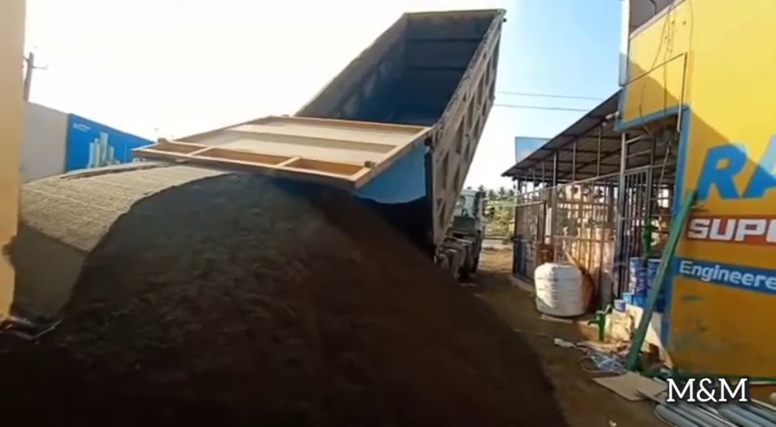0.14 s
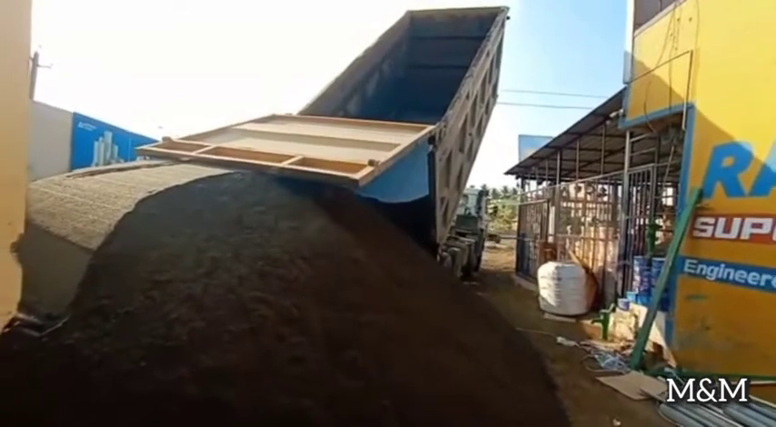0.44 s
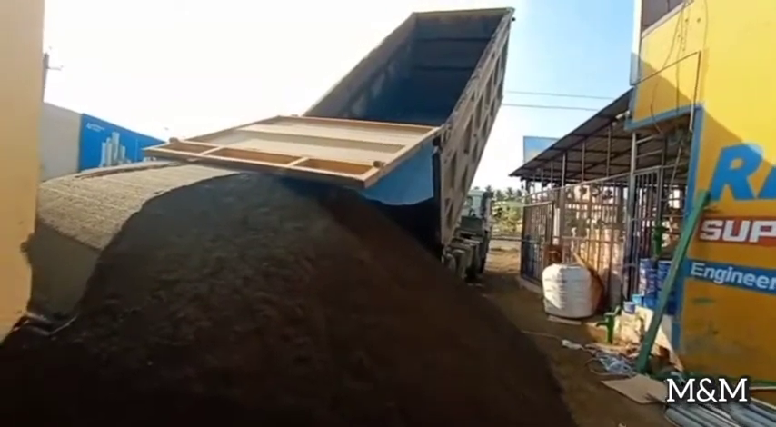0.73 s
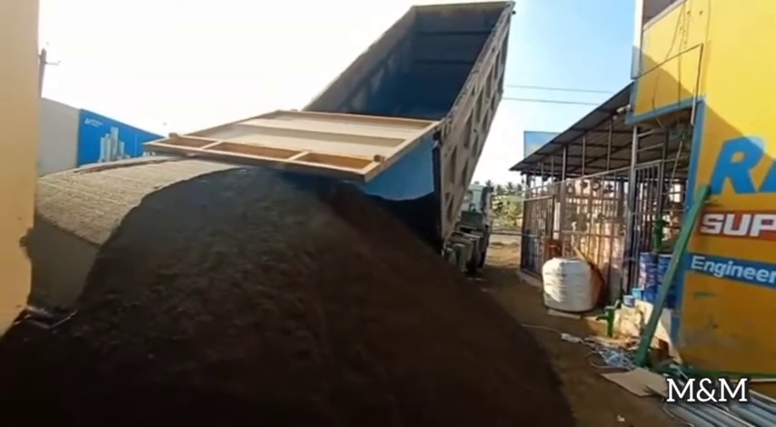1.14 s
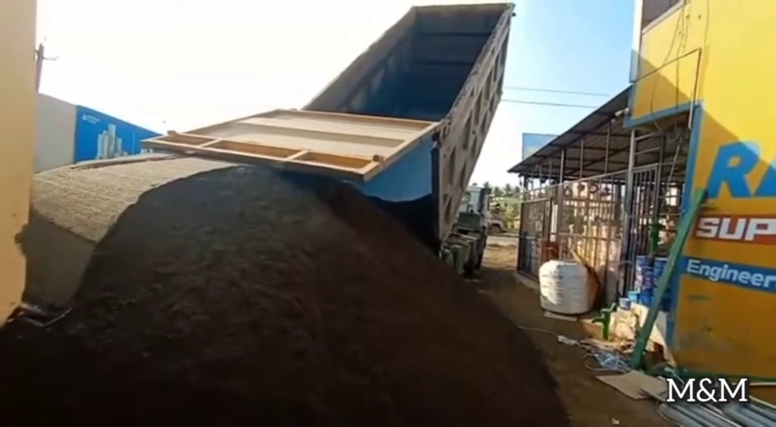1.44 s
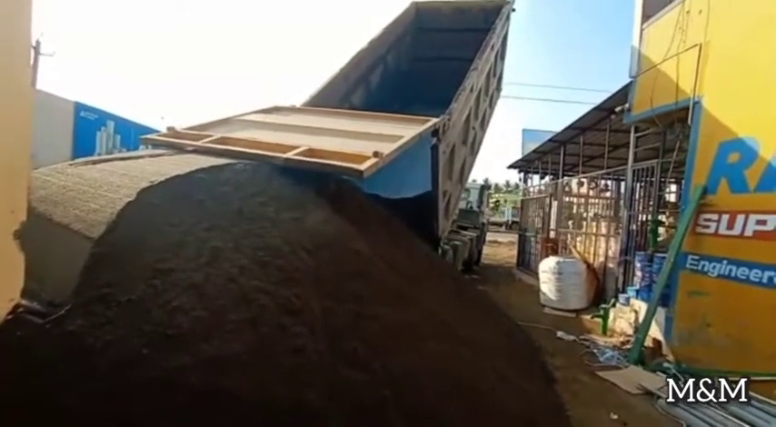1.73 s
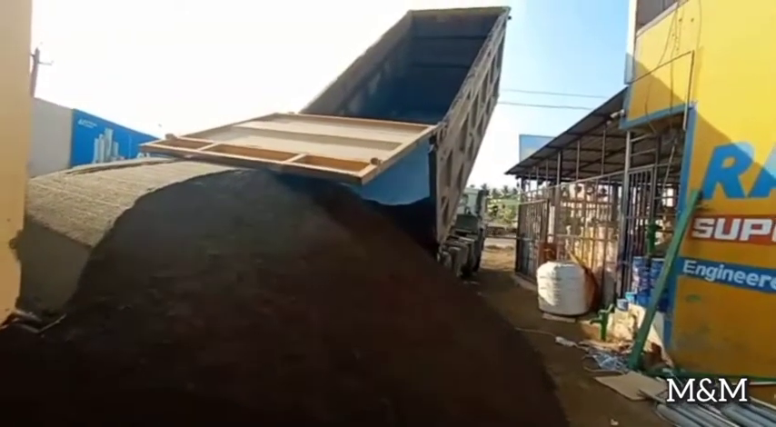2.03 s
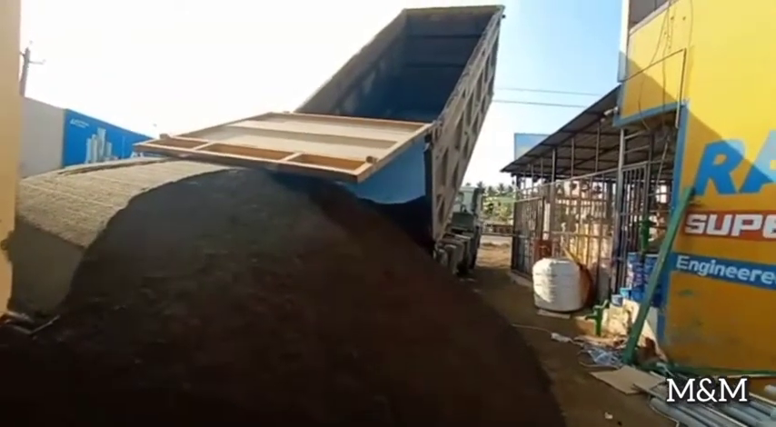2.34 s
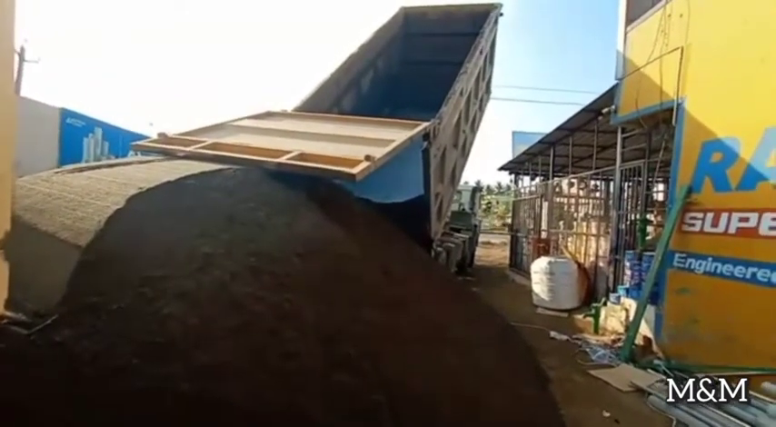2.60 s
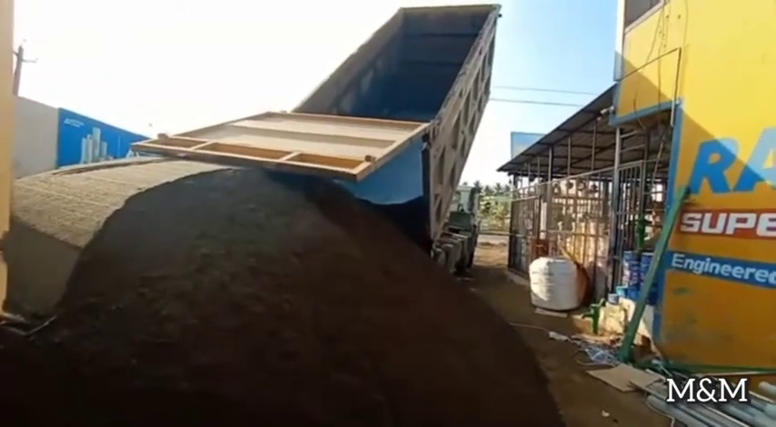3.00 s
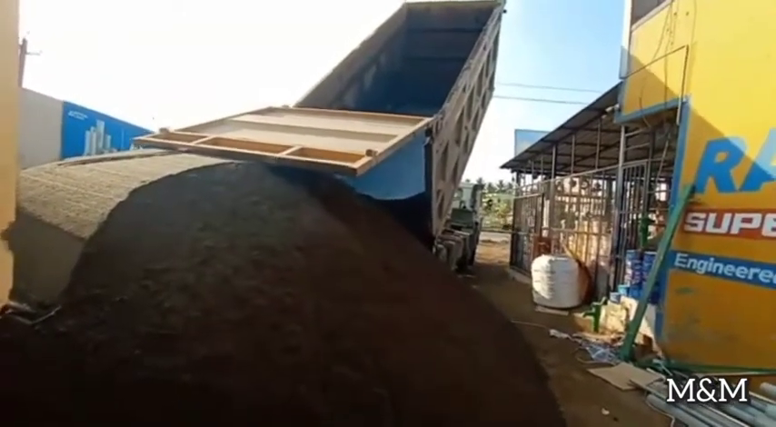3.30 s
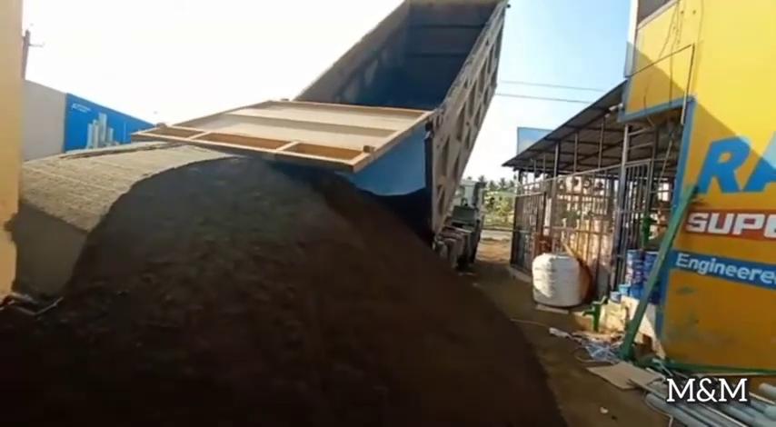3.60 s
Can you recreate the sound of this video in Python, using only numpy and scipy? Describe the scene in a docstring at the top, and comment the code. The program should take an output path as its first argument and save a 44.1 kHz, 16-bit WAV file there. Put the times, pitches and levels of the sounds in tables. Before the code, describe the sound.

Sand pours from a steel truck body in an open yard: a dense, patchy hiss, strongest at the start, thinning after about 1.7 s, with a slight swell near 2.8 s. Short whining hums, thin whistles and faint scrapes colour it over a low, uneven engine chug. At 3.27 s a far louder knock booms hollowly, with a bright air puff around 3.3-3.5 s and dull settling lumps as it rings into the end.

```python
"""A rushing hiss of sand sliding out of a raised steel tipper body in a yard: dense random grains,
coloured and patchy, over a steadier far rush from the heap and the low chug of the idling engine.
The rubbed steel hums, whistles and scrapes as narrow resonances of noise. Near the end the body takes
one heavy knock and booms on through noisy decaying modes, with a few dull lumps as it settles.
A short bright puff of air comes with the boom."""
import sys
import numpy as np
from scipy import signal
from scipy.fft import rfft, irfft
from scipy.io import wavfile

SR = 44100
rng = np.random.default_rng(int(sys.argv[2]) if len(sys.argv) > 2 else 0)


def int16_out(signal):
    """Quantize to a 16-bit WAV file."""
    q = np.round(np.clip(np.atleast_2d(signal).T, -1, 1) * 32767)
    wavfile.write(sys.argv[1], SR, q.astype(np.int16))


N = 165375

# Flow of the sand, heard as the level of its hiss. Each row: time in seconds, level in dB.
FLOW = [(0.0, -41.5), (0.22, -45), (0.66, -44), (0.88, -48.5), (1.43, -46.5), (1.62, -49.5), (1.79, -53.5),
        (2.05, -54), (2.77, -50.5), (2.87, -49.5), (3.05, -54.5), (3.28, -59.5), (3.45, -57.5),
        (3.75, -59.5)]
# Colour of the sand's hiss. Each row: frequency in Hz, relative density in dB per Hz.
HISS_COLOUR = [(440, -47), (750, -13), (885, -32), (956, -2.5), (1060, -11.5), (1250, -2), (1370, -4),
               (1650, -19), (1760, -19), (1980, -8), (2300, -11.5), (3890, -3), (4700, -8), (5480, -2.5),
               (6230, -12), (6900, -3.5), (8040, -23), (9610, -17.5), (13600, -31), (14800, -30.5),
               (15800, -23)]
BOOM_START_S, BOOM_RISE_S = 3.278, 0.0078  # the rise is a time constant


def sand():
    """Dense grains of either sign rush down the body, and a steadier far rush settles on the heap."""
    # Colour of the far heap. Each row: frequency in Hz, relative density in dB per Hz.
    heap_colour = [(24, -13), (40, -14.5), (64, -6.5), (189, -3.5), (230, -8.5), (268, -3.5), (327, -10),
                   (410, -8.5), (464, -8.5), (596, -9.5), (676, -13), (1260, -9), (1360, -9.5),
                   (2030, -12.5), (3110, -16), (5000, -58), (6750, -13.5), (8040, -34.5), (15800, -47)]
    grains_per_s = 9000
    signs = rng.choice([-1, 1], N)
    grains = rms_one(signs * (rng.random(N) < grains_per_s / SR))
    grains = grains + 1.77 * rng.standard_normal(N)  # grains too dense to tell apart
    flow_db = in_time(FLOW)
    rush = amp(flow_db) * patchy(grains, HISS_COLOUR, patchy_db=1.5, slow_hz=15, fast_hz=35)
    # the heap follows the flow only faintly
    heap_db = -47 + 0.082 * (flow_db - flow_db.mean())
    heap = patchy(rng.standard_normal(N), heap_colour, patchy_db=2, slow_hz=1, fast_hz=17.2)
    return rush + amp(heap_db) * heap


def hum():
    """Sand rubs the steel: noise in its resonances gives a hum, a murmur, a bright band and whistles."""
    # Resonances of the hum, the lower murmur, a bright band of the hiss that swells on its own,
    # and the thin whistles. Each row: frequency in Hz, width in Hz, relative level in dB.
    hum_modes = [(1269, 34, -5), (1236, 67, -4.5), (1424, 290, -10), (1640, 41, -9.5)]
    murmur_modes = [(625, 106, 3), (456.5, 29, -7.5)]
    bright_modes = [(5405, 140, -1.5), (5770, 210, 3)]
    whistle_modes = [(2560, 90, -19), (3250, 120, -18), (3730, 160, -17), (4025, 90, -19), (6700, 160, -14),
                     (6900, 140, -17)]
    # Swells of the first three. Each row: time in seconds, relative level in dB.
    hum_level = [(0.0, -49), (0.15, -41.5), (0.25, -56.5), (0.88, -49.5), (0.95, -69), (1.72, -56.5),
                 (2.7, -51.5), (3.25, -56.5), (3.29, -30), (3.36, -40), (3.45, -59), (3.75, -44)]
    murmur_level = [(0.0, -56), (0.06, -53), (0.22, -60), (1.56, -65.5), (1.97, -65), (1.99, -56.5),
                    (2.39, -66), (2.46, -55.5), (2.71, -68), (2.74, -55.5), (2.87, -65.5), (2.96, -55.5),
                    (3.23, -62.5), (3.25, -72)]
    bright_level = [(0.0, -48), (0.23, -50), (0.65, -45.5), (0.98, -51), (1.04, -58), (1.08, -49),
                    (1.25, -54), (1.27, -44.5), (1.88, -64), (2.99, -55), (3.08, -84), (3.25, -56)]
    flicker_db, flicker_hz = 1.5, 12
    out = resonant(hum_modes, flicker_db, flicker_hz) * amp(in_time(hum_level) - 1)
    out = out + resonant(murmur_modes, flicker_db, flicker_hz) * amp(in_time(murmur_level) + 1.5)
    out = out + resonant(bright_modes, flicker_db, flicker_hz) * amp(in_time(bright_level) - 10)
    whistles = resonant(whistle_modes, flicker_db=3.5, flicker_hz=8)
    return out + (whistles + streaks(count=44)) * amp(in_time(FLOW))


def streaks(count):
    """Thin resonances of the sliding sand wander in pitch and come and go, coloured like the hiss."""
    out = 0
    for hz in np.linspace(1900, 10500, count) * rng.uniform(.98, 1.02, count):
        level_db = -15 + at_hz(HISS_COLOUR, hz) + 4 * drift(6)
        wandering_hz = hz + 60 * drift(3)
        out = out + amp(level_db) * rough_tone(wandering_hz, width_hz=30)
    return out


def scrapes():
    """Brief scrapes on the steel and whining spurts of its hum: rough tones that sag in pitch."""
    # Scrapes, then spurts. Each row: start in seconds, length in seconds, first pitch in Hz, level in dB.
    scrape_rows = [(1.68, .25, 2290, -50), (2.05, .15, 1720, -55), (2.42, .08, 2170, -56),
                   (2.4, .08, 3700, -56), (2.55, .1, 3080, -57), (3.68, .1, 2700, -53),
                   (3.695, .06, 1040, -49)]
    spurt_rows = [(.04, .12, 1270, -46), (.19, .05, 1230, -49), (.29, .13, 1260, -46), (.5, .08, 1290, -50),
                  (.655, .08, 1280, -43), (.74, .06, 1280, -46), (.81, .075, 1270, -45),
                  (.95, .045, 1255, -50), (1.12, .06, 1255, -50), (1.28, .1, 1270, -51),
                  (1.49, .09, 1240, -51), (3.53, .06, 1270, -46), (3.62, .06, 1275, -46)]
    scraping = sagging(scrape_rows, width_hz=45, sag_hz_per_s=1000)
    return scraping + sagging(spurt_rows, width_hz=22, sag_hz_per_s=500)


def thump():
    """The heavy knock: contact notes, a crack, ringing modes and a boom, then dull settling lumps."""
    # The body settles in dull lumps. Each row: start in seconds, peak in dB, pitch in Hz.
    lumps = [(3.295, -26, 124), (3.41, -27, 120), (3.635, -32, 172), (3.685, -29.5, 212)]
    return knocks() + crack() + body_ring() + boom() + soft_notes(lumps)


def knocks():
    """The contact builds and holds for a few milliseconds, then each note dies at its own rate."""
    # Contacts on the body. Each row: start in seconds, level in dB.
    contacts = [(3.2655, -27), (3.2727, -8.5)]
    # Short notes of each contact. Each row: pitch in Hz, relative level in dB, 60 dB decay in seconds.
    notes = [(493, -3.5, 0.012), (190, -13, 0.063)]
    swell_s, hold_s = .003, .0085  # both counted from the start
    out = 0
    for start_s, level_db in contacts:
        t = since(start_s)
        swell = np.minimum(t / swell_s, 1)
        for hz, db, t60 in notes:
            dying = amp(-60 * np.maximum(t - hold_s, 0) / t60)
            out = out + amp(level_db + db) * swell * dying * np.sin(2 * np.pi * hz * t)
    return out


def crack():
    """A short rough burst of the upper plate resonances at the height of the blow."""
    # Plate resonances. Each row: frequency in Hz, width in Hz, relative level in dB.
    plate_modes = [(1000, 400, 4), (1500, 400, 5), (2200, 700, 1), (3400, 450, -2), (4100, 700, -10)]
    t = since(3.2745)
    envelope = amp(-32 - 60 * t / .2) * (1 - np.exp(-t / BOOM_RISE_S))  # dies by 60 dB in 0.2 s
    return envelope * resonant(plate_modes, flicker_db=0, flicker_hz=50)


def body_ring():
    """The plate modes of the body, roughened by the loose load, ring on and die from the blow."""
    # Each row: frequency in Hz, relative level in dB, 60 dB decay in seconds.
    body_modes = [(201, 5.5, 1.25), (270, 5, 0.52), (519.5, 10, 0.29), (580, 1, 2.1), (622, -13, 1.7),
                  (1054, -13, 1.5), (1577, -6, 0.89)]
    t = since(BOOM_START_S)
    rise = 1 - np.exp(-t / BOOM_RISE_S)
    out = 0
    for hz, db, t60 in body_modes:
        mode = amp(-60 * t / t60) * rough_tone(np.full(N, hz), width_hz=12)
        out = out + amp(-38 + db) * rise * mode
    return out


def boom():
    """Coloured noise in bands, each wavering and dying at the rate for its pitch."""
    # Colour of the boom. Each row: frequency in Hz, relative density in dB per Hz.
    boom_colour = [(24, -56), (40, -19), (108, -5), (290, -5), (347, -8.5), (443, -2), (520, 2), (587, -1),
                   (677, -3.5), (880, -13), (1270, -9), (1520, -17.5), (1650, -15.5), (1930, -20),
                   (3270, -29), (3690, -33), (5000, -39), (6500, -55), (11000, -120)]
    # Dying of the boom. Each row: frequency in Hz, 60 dB decay in seconds.
    boom_t60 = [(60, 9.1), (120, 3.4), (240, 2.24), (500, 0.88), (1000, 0.81), (2500, 1), (5000, 2.05)]
    t = since(BOOM_START_S)
    rise = 1 - np.exp(-t / BOOM_RISE_S)
    out = 0
    for hz, band in bands(rng.standard_normal(N), boom_colour):
        level_db = -21.5 - 60 * t / at_hz(boom_t60, hz) + 3 * drift(16)
        out = out + amp(level_db) * rise * band
    return out


def puff():
    """Air let off in a short bright, slightly sputtering hiss with thin whistles in it."""
    # Course of the puff. Each row: time in seconds, level in dB.
    puff_level = [(3.285, -60), (3.326, -40.5), (3.376, -35), (3.44, -49.5), (3.5, -70)]
    # Colour of the air. Each row: frequency in Hz, relative density in dB per Hz.
    puff_colour = [(2350, -23), (4000, -10), (4950, -21), (5750, -8.5), (6710, -8), (7110, -3.5),
                   (8300, -30), (9920, -25), (11200, -41), (15000, -46), (15800, -45)]
    # Whistles in the air. Each row: frequency in Hz, width in Hz, relative level in dB.
    puff_whistles = [(5940, 80, -11), (6490, 90, -5), (6900, 160, -3), (9870, 150, -30)]
    t = np.arange(N) / SR
    hiss = sum(band for _, band in bands(rng.standard_normal(N), puff_colour))
    air = rms_one(.7 * hiss + resonant(puff_whistles, flicker_db=2, flicker_hz=40))
    sputter_db = drift(150)
    blowing = (t > puff_level[0][0]) & (t < puff_level[-1][0])
    return amp(in_time(puff_level) + sputter_db) * blowing * air


def engine():
    """The idling engine chugs: a soft low note for each chug."""
    # Each row: start in seconds, peak in dB, pitch in Hz.
    chugs = [(0.088, -43.5, 195), (0.183, -38.5, 151), (0.297, -48, 197), (0.401, -45, 198),
             (0.472, -46, 199), (0.58, -44.5, 177), (0.706, -40.5, 190), (0.89, -47, 207),
             (1.005, -44.5, 170), (1.09, -49, 149), (1.188, -51, 136), (1.336, -46.5, 188),
             (1.413, -42.5, 129), (1.573, -40, 153), (1.697, -45, 150), (1.831, -44.5, 141),
             (1.93, -39.5, 153), (2.094, -47, 187), (2.212, -43, 190), (2.351, -43, 187), (2.493, -47, 200),
             (2.716, -43, 147), (2.854, -40.5, 166), (2.965, -43, 191), (3.131, -41, 180)]
    return soft_notes(chugs)


def soft_notes(rows):
    """Each row is a low note at a random phase that swells softly and dies."""
    swell_hz, t60_s = 25, 0.089
    out, t = np.zeros(N + SR), np.arange(SR // 4) / SR
    shape = (1 - np.exp(-2 * np.pi * swell_hz * t)) ** 2 * amp(-60 * t / t60_s)
    shape = shape / shape.max()
    for (start_s, db, hz), phase in zip(rows, rng.random(len(rows))):
        i = int(start_s * SR)
        out[i:i + len(t)] += amp(db) * shape * np.sin(2 * np.pi * (hz * t + phase))
    return out[:N]


def sagging(rows, width_hz, sag_hz_per_s):
    """Each row is a rough narrow tone that swells and fades while its pitch sags."""
    out, t = 0, np.arange(N) / SR
    for start_s, length_s, hz, db in rows:
        age = np.clip(t - start_s, 0, length_s)
        tone = rough_tone(hz - sag_hz_per_s * age, width_hz, steady=1.6)
        out = out + amp(db) * tone * np.sin(np.pi * age / length_s)
    return out


def rough_tone(hz, width_hz, steady=0):
    """A narrow tone along a pitch curve, its two quadratures wandering at random; rms about 1."""
    phase = 2 * np.pi * np.cumsum(hz) / SR
    tone = np.cos(phase) * (steady + drift(width_hz)) + np.sin(phase) * drift(width_hz)
    return tone / np.sqrt(1 + steady ** 2 / 2)


def resonant(table, flicker_db, flicker_hz):
    """Noise through each resonance of a table (two resonators in a row), each flickering on its own."""
    out = 0
    for hz, width_hz, db in table:
        r = np.exp(-np.pi * width_hz / SR)
        poles = [1, -2 * r * np.cos(2 * np.pi * hz / SR), r * r]
        tone = signal.lfilter([1, 0, -1], poles, rng.standard_normal(N))
        tone = signal.lfilter([1], poles, tone)
        out = out + amp(db + flicker_db * drift(flicker_hz)) * rms_one(tone)
    return out


def patchy(source, spectrum, patchy_db, slow_hz, fast_hz):
    """Coloured noise whose bands waver with all the others, with their neighbours and on their own."""
    out, together, near = 0, drift(fast_hz), drift(slow_hz)
    for hz, band in bands(source, spectrum):
        near = 0.25 * near + 0.86 * drift(slow_hz)  # partly shared with the band below
        waver = 0.16 * together + near + 1.27 * drift(fast_hz)
        depth_db = patchy_db / (1 + (hz / 23000) ** 2)  # a little smoother in the treble
        out = out + band * amp(depth_db * waver)
    return out


def bands(source, spectrum):
    """The source coloured to rms 1 and dealt out in overlapping third-octave bands: (centre Hz, band)."""
    hz = np.arange(1, N // 2 + 2) * SR / N
    low_hz, high_hz = spectrum[0][0], spectrum[-1][0]
    inside = (hz > low_hz) & (hz < high_hz)
    whole = rfft(source) * amp(at_hz(spectrum, hz)) * inside
    whole = whole / np.sqrt(np.mean(irfft(whole, N) ** 2))
    for centre in 2 ** np.arange(5, 14.3, 1 / 3):
        if low_hz < centre * 1.26 and centre < high_hz * 1.26:
            # triangles that cross over on a log frequency scale
            weight = np.clip(1 - 3 * np.abs(np.log2(hz / centre)), 0, 1)
            yield centre, irfft(whole * weight, N)


def drift(rate_hz):
    """Random wander of spread about 1: low-passed noise, drawn at every 40th sample."""
    r = np.exp(-80 * np.pi * rate_hz / SR)
    noise = rng.standard_normal(N // 40 + 2002)
    slow = signal.lfilter([1], [1, -2 * r, r * r], noise)[2000:]  # skip the filter's start
    return np.interp(np.arange(N) / 40, np.arange(len(slow)), rms_one(slow))


def since(start_s):
    """Seconds since a start, 0 before it."""
    return np.maximum(np.arange(N) / SR - start_s, 0)


def in_time(rows):
    """Level curve in dB, one value a sample, straight between the rows."""
    s, db = np.transpose(rows)
    return np.interp(np.arange(N) / SR, s, db)


def at_hz(points, hz):
    """Value of a table at a frequency, straight between the rows on a log frequency scale."""
    table_hz, values = np.transpose(points)
    return np.interp(np.log(hz), np.log(table_hz), values)


def amp(db):
    """Amplitude factor of a level in dB."""
    return 10 ** (np.asarray(db) / 20)


def rms_one(x):
    """The signal scaled to rms 1."""
    return x / np.sqrt(np.mean(x ** 2) + 1e-20)


def scene():
    """All sources in the yard summed to one channel."""
    return (sand() + hum() + scrapes() + thump() + puff() + engine())[None]


def record(dry):
    """The microphone loses the deep bass below about 60 Hz; the top is cut steeply at 15.5 kHz."""
    bass_cut = signal.butter(2, 60.4, "high", fs=SR, output="sos")
    top_cut = signal.ellip(12, .5, 60, 15500, fs=SR, output="sos")
    thin = signal.sosfilt(bass_cut, dry)
    return signal.sosfilt(top_cut, thin)


dry = scene()
out = record(dry)
int16_out(out)
```